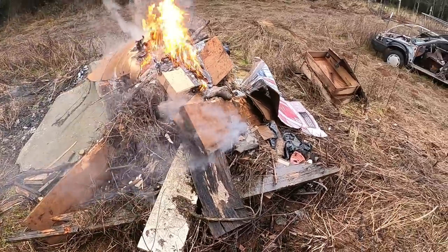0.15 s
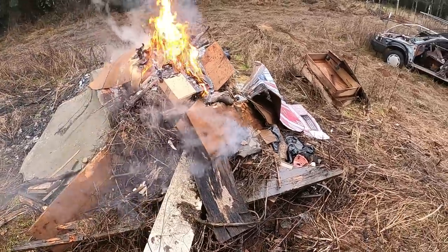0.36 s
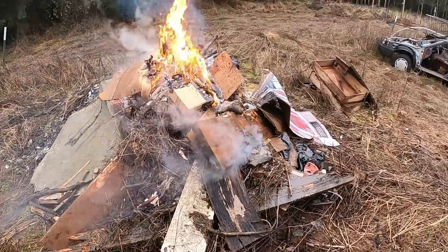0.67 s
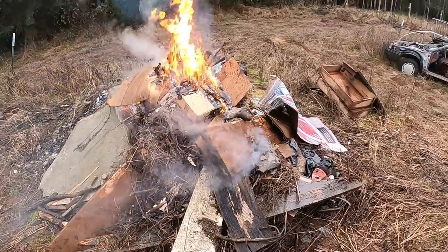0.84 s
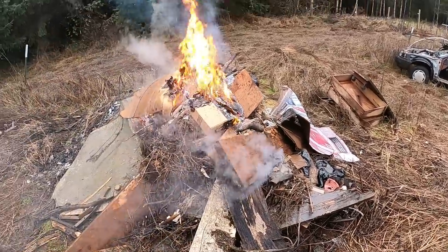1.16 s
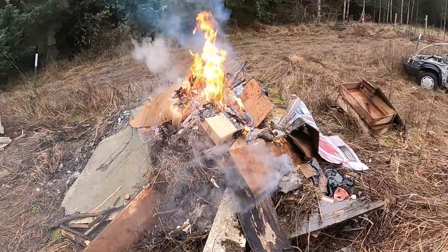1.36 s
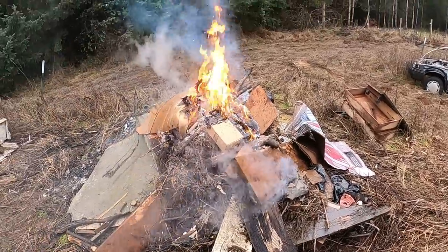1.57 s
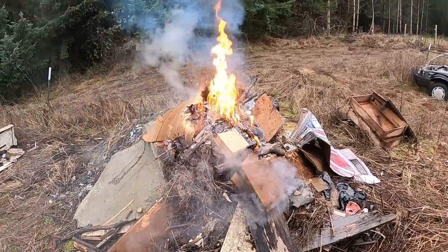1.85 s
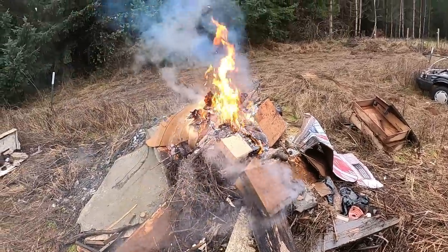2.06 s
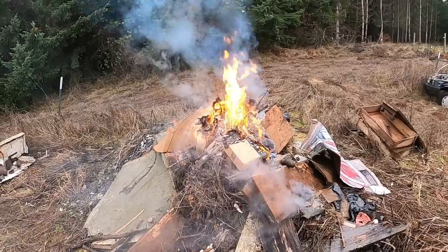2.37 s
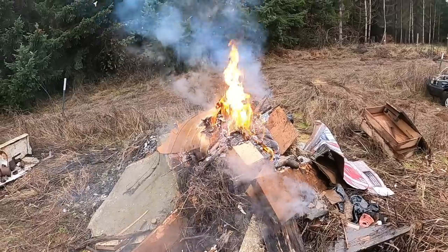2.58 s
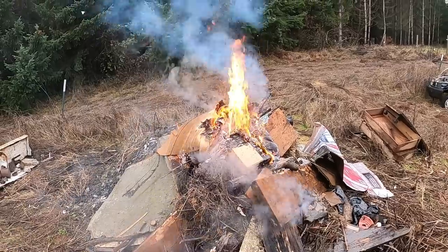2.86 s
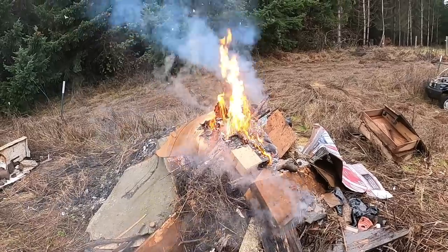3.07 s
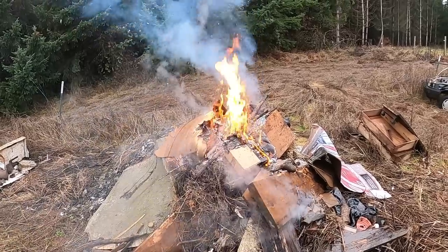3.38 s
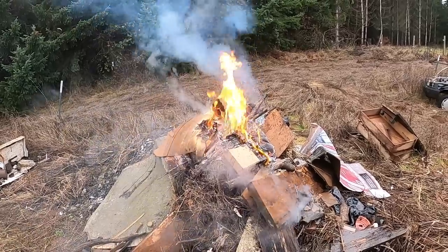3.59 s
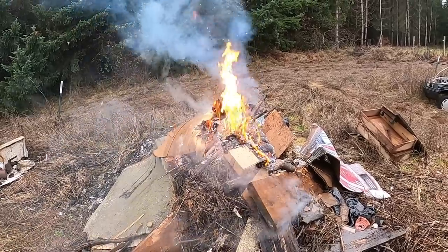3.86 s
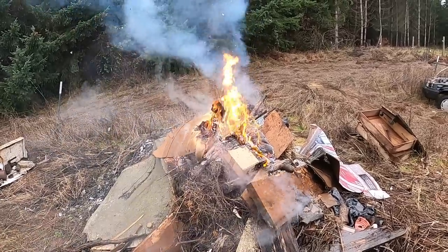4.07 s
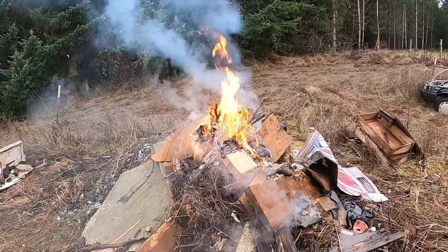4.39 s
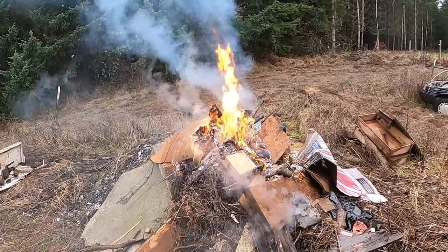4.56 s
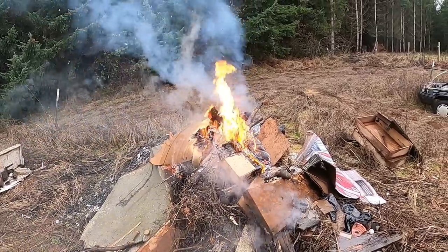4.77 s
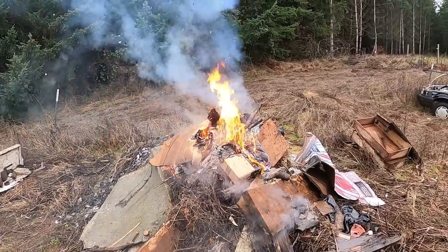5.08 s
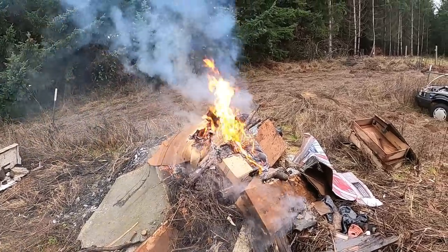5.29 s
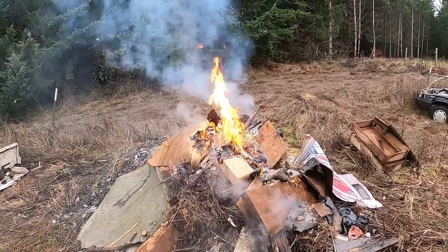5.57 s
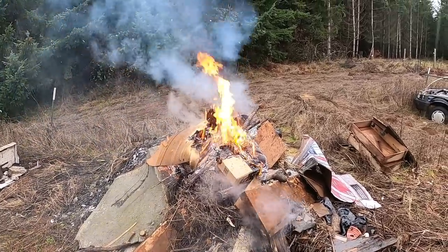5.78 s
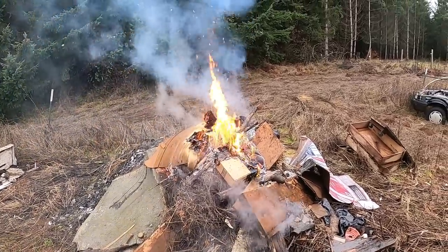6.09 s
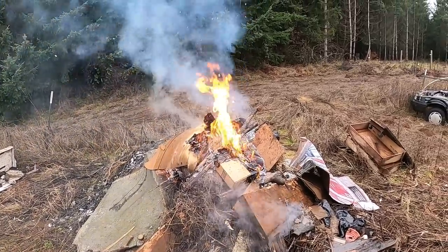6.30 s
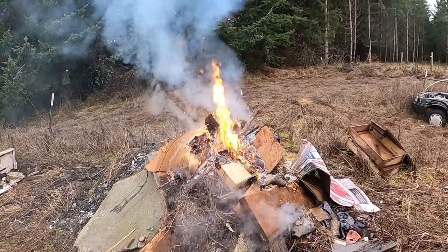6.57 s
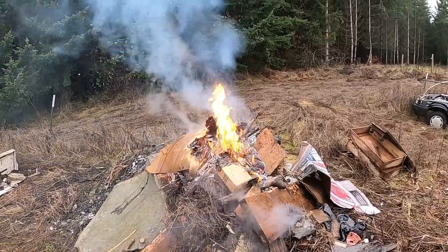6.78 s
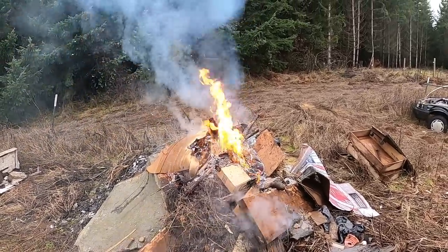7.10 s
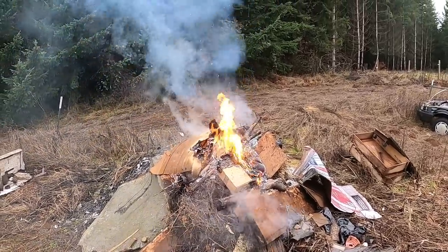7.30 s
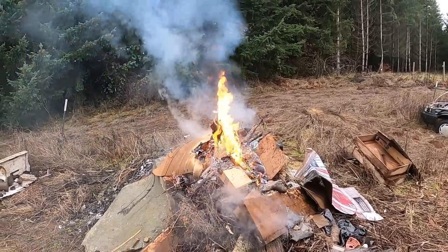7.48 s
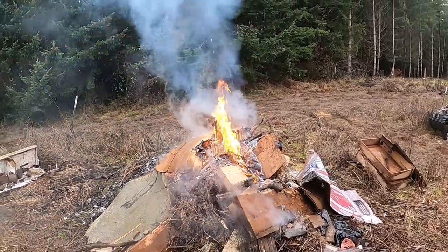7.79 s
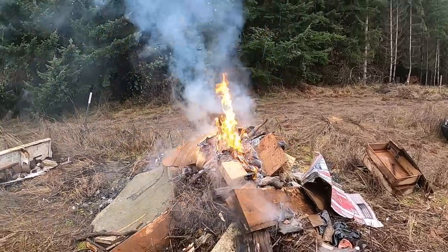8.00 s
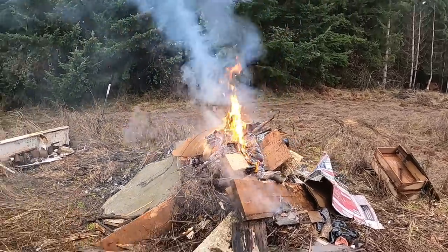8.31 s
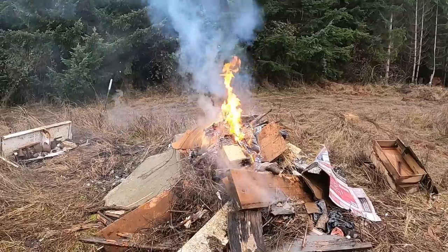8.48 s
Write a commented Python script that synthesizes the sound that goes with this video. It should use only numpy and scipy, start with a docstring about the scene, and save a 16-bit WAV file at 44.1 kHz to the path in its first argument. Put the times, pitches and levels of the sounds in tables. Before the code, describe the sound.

A pile of wood, cardboard and rubbish burns a few steps away, slightly to the right, in an open field by a forest. For nearly nine seconds the flames rumble softly under an even sizzle and fine crackle. Sharp, dry pops stand well above this, irregularly, several a second. The loudest come at about 0.2 seconds, in a run from 2 to 3, then at 4.3, 5.1, 5.7, 6.3 and 7.5. Each big pop briefly stirs the fire, and a few echo off the trees. Tiny, soft, pitched puffs of gas appear now and then, and steam hisses briefly at 0.5 and just after 7 seconds. A faint, distant low hum wavers underneath, fades away around 6 seconds and returns slightly lower by 7.4. The fire is a little calmer at the end, with a few smaller pops.

```python
"""In a field at the edge of a forest, a pile of wood, cardboard and rubbish burns a few steps away.
Flames rumble, embers sizzle and crackle, and a distant low hum fades and returns lower.
Pockets of steam burst in the wood as dry pops, impulses reflected by the ground, the junk and the trees.
Escaping gas excites cavities in the wood as soft pitched puffs, and jets of steam hiss briefly."""
import sys
import numpy as np
from scipy import signal
from scipy.fft import rfft, irfft
from scipy.io import wavfile
from scipy.ndimage import uniform_filter1d

SR = 44100
rng = np.random.default_rng(int(sys.argv[2]) if len(sys.argv) > 2 else 0)


def pcm_store(signal):
    """Save signal as 16-bit PCM."""
    levels = np.round(np.clip(np.atleast_2d(signal), -1, 1) * 32767)
    wavfile.write(sys.argv[1], SR, levels.astype(np.int16).T)


N = 381465

# spectra of the flames, the sizzle and the crackle: (frequency [Hz], relative level [dB])
FLAME_SPECTRUM = [(15, -29), (25, -5), (55, 3.5), (72, -3), (100, -8.5), (190, -6.5), (270, -11.5),
                  (400, -22.5), (700, -25.5), (2000, -57)]
SIZZLE_SPECTRUM = [(200, -16), (600, -14), (850, -4.5), (1200, 4.5), (1780, 1), (2100, -2.5), (3300, -5.5),
                   (5400, -7), (6800, -14.5), (8500, -10), (12500, -34.5), (15500, -18)]
CRACKLE_SPECTRUM = [(150, -38), (600, -5), (1400, -3), (4500, -2.5), (8000, -9), (12500, -14.5),
                    (16000, -35)]
# embers burning evenly, a little calmer at the end: (time [s], level [dB])
EMBER_LEVELS = [(0, -49), (2.4, -48.5), (3.0, -50), (3.45, -49), (4.5, -50), (5.0, -47.5), (6.05, -49.5),
                (6.35, -49), (7.35, -49), (8.0, -51), (8.65, -51)]
# course of the distant hum: (time [s], pitch [Hz], level [dB])
HUM_COURSE = [(0, 74.5, -42.5), (2.35, 76.2, -41.5), (3, 77, -47), (5.4, 79.5, -48), (6.1, 78, -56.5),
              (6.75, 72.05, -61), (7.35, 69.5, -45), (8.65, 69.5, -45.5)]
# the clearest bursts of steam: (time [s], strength [dB], treble [dB], bass [dB],
# scatter from the junk [dB], resonance of the split piece [Hz])
STEAM_BURSTS = [(0.11, 3, -7.5, -8, -11.5, 2810), (0.196, -3, -12, 1, -3, 2800),
                (0.2075, 20.5, -12, -1.5, -19, 4800), (0.3087, -3, -14, -1, -20, 900),
                (0.4953, 7, 1, -9.5, -19, 3240), (0.558, -6.5, -19, 2, -14, 4300),
                (0.878, 10, 1, -6.5, -19, 4760), (1.0796, -6, 0, -12, -7, 1400),
                (1.2222, 7.5, 3.5, -1.5, -21, 4050), (1.3614, -4.5, -4, 0.5, -5, 1300),
                (1.704, 3, -6, -2, -11.5, 1040), (1.7672, 7, 0, -1.5, -30, 5400),
                (1.9843, 18, -9.5, -1.5, -14, 6150), (2.1282, 8.5, -3.5, 1, -21, 4100),
                (2.3221, 18, -5.5, -3, -19.5, 6300), (2.4848, 11.5, -9.5, -3, -16.5, 6300),
                (2.593, 15, -14, -4.5, -11.5, 6300), (2.6416, -2, 0, -7, -14, 3340),
                (2.7034, -15, 11, -3, -8, 4100), (2.8405, 4.5, -7, -0.5, -12, 890),
                (2.9156, 16.5, -8, -12, -18.5, 3340), (3.2428, 9, -11.5, 0.5, -13, 930),
                (3.5052, -6, -10, -4, -19.5, 2200), (3.5379, 10.5, -11, -5.5, -21, 3400),
                (3.9615, 6.5, -5, -2, -9.5, 4130), (4.1399, 12.5, -6, 0.5, -14, 2800),
                (4.25, 19, -3, -3, -22, 5470), (4.594, -7, 0, -7, -10, 5200),
                (4.7806, -2.5, -15, 3, -10, 2060), (4.9474, 9, -7, -8.5, -12.5, 3600),
                (5.1294, 17.5, -7.5, -6.5, -7, 3620), (5.337, 2, 3.5, -1, -25, 4060),
                (5.6746, 17, -1.5, -4, -15, 2900), (6.2436, 3.5, -30, -2, -16, 895),
                (6.3418, 14, 2.5, -2, -18.5, 2400), (6.4377, 2.5, -9.5, 1, -16, 885),
                (6.5742, -7.5, -1, -2, -8, 1000), (7.153, -9.5, 7, -9, -23, 3800),
                (7.1795, -1.5, -10, -8, -4, 5700), (7.2057, 4, -11.5, -3, -14, 6300),
                (7.2752, -3.5, 4.5, -27, -31, 3980), (7.3583, 8.5, -6, -11, -12.5, 4170),
                (7.4691, -11, 5.5, -11, -18.5, 4700), (7.5117, 20, -10, -2, -20, 2930),
                (8.2427, -7, -23, 4, -7, 6300), (8.5362, 4, -12, 2, -12, 1240),
                (8.5957, 0.5, -8.5, 4, -4, 1490)]
# spectrum of a burst: (frequency [Hz], relative level [dB])
POP_SPECTRUM = [(40, -29), (130, -8.5), (220, 3), (450, 5.5), (800, -2.5), (1150, 6), (1700, 0.5),
                (2150, -0.5), (3100, -0.5), (5800, -6), (7200, -11), (12000, -25.5), (16000, -47)]
# reverberation of the forest: (frequency [Hz], 60 dB decay time before stretching [s])
FOREST_DECAY = [(200, 0.52), (1000, 0.81), (3000, 0.5), (8000, 0.53), (15000, 0.26)]
# spectrum of that reverberation: (frequency [Hz], relative level [dB])
FOREST_SPECTRUM = [(100, -3), (500, -5), (1500, 2), (3500, 8.5), (12000, 13.5)]
# pops ringing back from the trees:
# (time [s], level [dB], centre [Hz], half width [octaves], decay stretch [ratio])
TREE_ECHOES = [(0.206, -2, 2400, 0.54, 3.2), (2.322, -2, 3680, 0.54, 1.23), (5.675, -3, 6500, 0.21, 1.27),
               (7.512, 1.5, 2920, 0.52, 1.5)]
# puffs of gas from the wood: (time [s], level [dB], centre [Hz], length [s])
GAS_PUFFS = [(0.322, -46, 3540, 0.022), (0.439, -45.5, 1690, 0.024), (3.303, -45, 1240, 0.042),
             (3.99, -47, 1130, 0.014), (6.135, -46, 1490, 0.015), (7.376, -42.5, 3250, 0.015)]
# jets of steam from the wood: (time [s], length [s], level [dB])
STEAM_JETS = [(0.493, 0.023, -40), (7.08, 0.1, -44), (7.193, 0.26, -55)]
# likeness of diffuse sound in the two channels: (frequency [Hz], coherence [ratio])
COHERENCE = [(50, .95), (300, .92), (700, .87), (1400, .8), (3100, .65), (7000, .4), (15000, .1)]
# stereo balance: (frequency [Hz], left minus right [dB])
STEREO_BALANCE = [(60, 1.5), (300, 1), (2000, 1.5), (5000, 0.5), (8000, 0), (14000, -5.5)]
# phase of the left channel against the right, negative for a lag: (frequency [Hz], phase [rad])
LEFT_PHASE = [(20, -0.43), (250, -0.37), (1000, -0.38), (2100, -0.78), (5000, -0.85), (8000, -1.7),
              (14000, -1.8)]


def gain_of(db):
    """Amplitude grows tenfold for every 20 dB."""
    return 10 ** (np.asarray(db) / 20)


def unit_rms(x):
    """Normalisation to an rms of 1."""
    return x / np.sqrt(np.mean(x ** 2) + 1e-20)


def at_hz(points, hz):
    """Interpolation of a spectrum on a log-frequency axis."""
    f, value = np.transpose(points)
    return np.interp(np.log(hz + 1), np.log(f + 1), value)


def curves(rows):
    """Linear interpolation of each column of a time table, sample by sample."""
    s, *columns = np.transpose(rows)
    return [np.interp(np.arange(N) / SR, s, c) for c in columns]


def add(mix, s, sound):
    """Superposition: a sound joins the mix at time s."""
    part = mix[..., max(round(s * SR), 0):][..., :sound.shape[-1]]
    part += sound[..., :part.shape[-1]]


def bins(size):
    """Frequencies of a discrete Fourier transform."""
    return np.fft.rfftfreq(size, 1 / SR)


def pulse(db):
    """Minimum phase gives the shortest causal pulse with this spectrum."""
    log_gain = np.log(gain_of(np.concatenate([db, db[-2:0:-1]])))
    return np.fft.ifft(np.exp(np.conj(signal.hilbert(log_gain)))).real


def drift(hz):
    """Band-limited random fluctuation of rms 1, no faster than hz."""
    return unit_rms(irfft(rfft(rng.standard_normal(N)) * (bins(N) < hz), N))


def diffuse(spectrum, patchy_db):
    """A diffuse field: noise with drifting patches, less coherent between channels as frequency rises."""
    hz = bins(1024)
    a, b, c, d, patches = rng.standard_normal((N // 256 + 5, len(hz), 5)).T
    patches = unit_rms(uniform_filter1d(uniform_filter1d(patches, size=14, axis=0), size=12, axis=1))
    coherence = np.clip(at_hz(COHERENCE, hz), -1, 1)[:, None]
    left = a + 1j * b
    right = coherence * left + np.sqrt(1 - coherence ** 2) * (c + 1j * d)
    frames = np.array([left, right]) * gain_of(at_hz(spectrum, hz)[:, None] + patchy_db * patches)
    return unit_rms(signal.istft(frames, nperseg=1024, noverlap=768)[1][:, :N])


def flare(settle_s=0.085, full_db=20):
    """Relaxation: gas freed by a burst feeds the fire, a step of 1 at full_db that decays exponentially."""
    kicks = np.zeros(N)
    for s, db, *_ in STEAM_BURSTS:
        add(kicks, s, gain_of([db - full_db]))
    return signal.lfilter([1], [1, -np.exp(-1 / (settle_s * SR))], kicks)


def flames(surge, level_db=-44, flutter_db=1.5, swell_db=.6, flare_db=4):
    """Combustion noise: a low rumble that flutters, swells and rises with each surge of gas."""
    db = level_db + flutter_db * drift(hz=10) + swell_db * drift(hz=1.2) + flare_db * surge
    return gain_of(db) * diffuse(FLAME_SPECTRUM, patchy_db=0.7)


def crackle(per_s=650, spread_db=6, colour_db=3, clumping=.6, ring=0.13, ring_s=0.0023, twigs=60):
    """Shot noise: tiny snaps come in flurries, each twig with its own colour and damped resonance."""
    hz, t = bins(512), np.arange(512) / SR
    out = np.zeros((2, N))
    chance = per_s / twigs / SR * np.exp(clumping * drift(hz=10))
    for twig_hz in np.geomspace(1100, 6000, twigs):
        colour = np.transpose([np.geomspace(600, 14000, 8), colour_db * rng.standard_normal(8)])
        snap = pulse(at_hz(CRACKLE_SPECTRUM, hz) + at_hz(colour, hz))
        resonance = ring * np.exp(-t / ring_s) * np.cos(2 * np.pi * twig_hz * t)
        rattle = 0.17 * rng.standard_normal((2, len(t))) * np.exp(-t / 0.0019)
        grain = unit_rms(irfft(rfft(snap) * rfft((t == 0) + rattle + resonance)))
        starts = np.flatnonzero(rng.random(N) < chance)
        sizes = gain_of(spread_db * np.minimum(rng.exponential(1, N)[starts], 4))
        for start, size in zip(starts, sizes):
            add(out, start / SR, size * grain)
    return unit_rms(out)


def embers(surge, sizzle_db=-3, crackle_db=-4.5, stir_db=3, waver_db=.5):
    """Common modulation: sizzle and crackle share one envelope, which rises with each surge of gas."""
    db, = curves(EMBER_LEVELS)
    sizzle = diffuse(SIZZLE_SPECTRUM, patchy_db=1.1) * gain_of(.7 * drift(hz=50))
    sound = gain_of(sizzle_db) * sizzle + gain_of(crackle_db) * crackle()
    return gain_of(db + stir_db * surge + waver_db * drift(hz=4.4)) * sound


def hum(level_db=-1, waver_db=4, wander_hz=1.55):
    """Random frequency and amplitude modulation make a low pure tone waver."""
    hz, db = curves(HUM_COURSE)
    cycles = np.cumsum(hz + wander_hz * drift(hz=11.6)) / SR
    envelope = gain_of(db + level_db + waver_db * drift(hz=11))
    return envelope * np.sqrt(2) * np.sin(2 * np.pi * cycles)


def pop(db, treble_db, bass_db, junk_db, ring_hz):
    """Multipath interference: a burst's pulse adds to its reflections from pile, ground and junk."""
    hz, t = bins(4096), np.arange(4096) / SR
    shared, left, right, hollow = rng.standard_normal((4, len(t)))
    # the paths through the pile differ between the channels mostly in the treble
    paths = shared + irfft(rfft(np.array([left, right])) * (0.63 + (hz / 7000) ** 2))
    pile_db, pile_s = -9, 0.0032
    rattle = rfft(paths * np.exp(-t / pile_s)) / np.sqrt(pile_s * SR / 2) * hz / (hz + 1500)
    # the hollows of the pile answer with a short low thud
    thud_hz, thud_s = 300, 0.0067
    lowpass = signal.butter(4, thud_hz, fs=SR, output="sos")
    thud = rfft(signal.sosfilt(lowpass, hollow * np.exp(-t / thud_s))) / np.sqrt(thud_s * SR / 2)
    # soft ground returns little treble, and its delay cancels part of the low mids
    ground_s = 0.001252 * rng.uniform(0.844, 1.037)
    bounce = 0.72 * np.exp(-2j * np.pi * hz * ground_s) / (1 + (hz / 2500) ** 2)
    # boards close by scatter at once, the junk further off a little later
    junk_s = 0.014 * rng.uniform(.93, 1.12)
    boards = 1.96 * np.exp(-t / 0.0051)
    junk = (t > junk_s) * np.exp(-(t - junk_s) / 0.011)
    clumps = np.exp(.5 * np.interp(t, t[::64], rng.standard_normal(len(t[::64]))))
    scatter = paths * clumps * (boards + junk)
    scatter = rfft(scatter) / np.linalg.norm(scatter[0])
    transfer = 1 + bounce + gain_of(pile_db) * rattle + thud + gain_of(junk_db + 17) * scatter
    tilt_db = at_hz([(700, bass_db), (1300, 0.015), (2600, 0), (6500, treble_db)], hz)
    burst = rfft(pulse(at_hz(POP_SPECTRUM, hz) + tilt_db))
    # an all-pass filter follows the push with a suction
    collapse = (1j * hz / 800 - 1) / (1j * hz / 800 + 1)
    # the split piece of wood rings for a cycle or two
    resonance = 1 + .7 / (1 + 1j * (hz - ring_hz) / (.11 * ring_hz))
    spectrum = burst * collapse * resonance * transfer
    midband_rms = np.sqrt(np.mean(abs(spectrum[:, (hz > 900) & (hz < 3000)]) ** 2))
    return gain_of(db) * irfft(spectrum) / midband_rms


def forest_tail(colour_db, stretch=0.73, start_s=0.02, rise_s=0.031):
    """Reverberation: reflections from many trunks decay band by band; colour_db is a function of Hz."""
    t = np.arange(SR) / SR
    shared, left, right = rng.standard_normal((3, SR))
    hz, when, frames = signal.stft(shared + .8 * np.array([left, right]), SR, nperseg=256)
    t60 = stretch * at_hz(FOREST_DECAY, hz)
    frames *= gain_of(colour_db(hz)[:, None] - 60 * when / t60[:, None])
    onset = 1 - np.exp(-np.maximum(t - start_s, 0) / rise_s)
    lumps = gain_of(1.5 * drift(hz=60)[:SR])  # groups of trunks answer together
    return signal.istft(frames, SR, nperseg=256)[1][:, :SR] * onset * lumps / np.sqrt(SR / 20)


def pops(forest_db=-21, echo_db=1):
    """Convolution gives the pops the forest's faint answer; a few also ring back in a band of their own."""
    direct, echoes = np.zeros((2, 2, N))
    for s, *burst in STEAM_BURSTS:
        add(direct, s, pop(*burst))
    for s, db, centre_hz, octaves, stretch in TREE_ECHOES:
        band = lambda hz: -10 * np.log10(1 + (np.log2((hz + 1) / centre_hz) / octaves) ** 4)
        add(echoes, s, gain_of(db + echo_db) * forest_tail(band, stretch))
    response = forest_tail(lambda hz: at_hz(FOREST_SPECTRUM, hz))
    forest = signal.fftconvolve(direct, response, axes=1)[:, :N]
    return direct + gain_of(forest_db) * forest + echoes


def small_pops(count=18):
    """Random impulses: one smaller pocket bursts at a chance moment in each equal span of time."""
    out = np.zeros((2, N))
    for k, (when, pitch, size, bright) in enumerate(rng.random((count, 4))):
        sound = pop(db=-14.5 + 4 * size, treble_db=-5 + 12 * bright, bass_db=-4, junk_db=-13,
                    ring_hz=1000 * 6 ** pitch)
        add(out, (k + when) / count * N / SR, sound)
    return out


def puffs(half_width_hz=420):
    """Cavity resonance: gas escapes through a small hollow in the wood, which gives each puff its pitch."""
    out = np.zeros((2, N))
    for s, db, centre_hz, length_s in GAS_PUFFS:
        noise = rng.standard_normal((2, 4096))
        cavity = 1 / (1 + ((bins(4096) - centre_hz) / half_width_hz) ** 4)
        ring = irfft(rfft(noise[0] + 0.4 * noise) * cavity)[:, :round(length_s * SR)]
        add(out, s, gain_of(db) * unit_rms(ring * signal.windows.tukey(ring.shape[1], .7)))
    return out


def jets(sputter_db=3):
    """Jet noise: steam escapes in short, sputtering broadband hisses."""
    flow = np.zeros(N)
    for s, length_s, db in STEAM_JETS:
        add(flow, s, gain_of(db) * signal.windows.tukey(round(length_s * SR), .5))
    hiss = diffuse([(500, -16), (1500, 1), (4000, 1), (9000, -9), (15000, -19)], patchy_db=-5)
    return flow * gain_of(sputter_db * drift(hz=201)) * hiss


def scene():
    """Path difference: the fire lies a little to the right, so the summed sound lags on the left."""
    bursts = pops() * gain_of([[-.5], [.5]]) + small_pops()
    surge = flare()
    mix = bursts + flames(surge) + embers(surge) + jets() + puffs() + hum()
    hz = bins(N)
    lean_db = at_hz(STEREO_BALANCE, hz) / 2
    left = gain_of(lean_db) * np.exp(1j * at_hz(LEFT_PHASE, hz))
    right = gain_of(-lean_db)
    return irfft(rfft(mix) * np.array([left, right]), N)


def record(dry, edge_hz=16200):
    """Overload and band limiting: the loudest pops clip, then the treble rolls off towards edge_hz."""
    top_db = at_hz([(9000, 0), (13000, -1.5), (14800, -8), (16000, -16)], bins(N))
    dulled = irfft(rfft(np.clip(dry, -1, 1)) * gain_of(top_db), N)
    lowpass = signal.firwin(255, edge_hz, window=("kaiser", 9), fs=SR)
    return signal.oaconvolve(dulled, lowpass[None], "same")


dry = scene()
out = record(dry)
pcm_store(out)
```